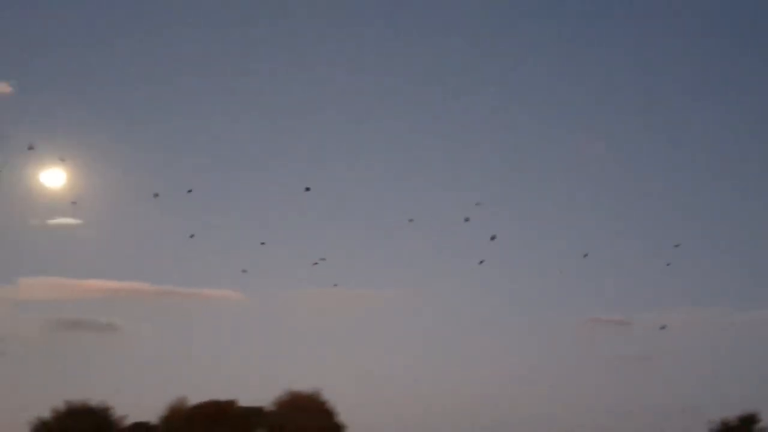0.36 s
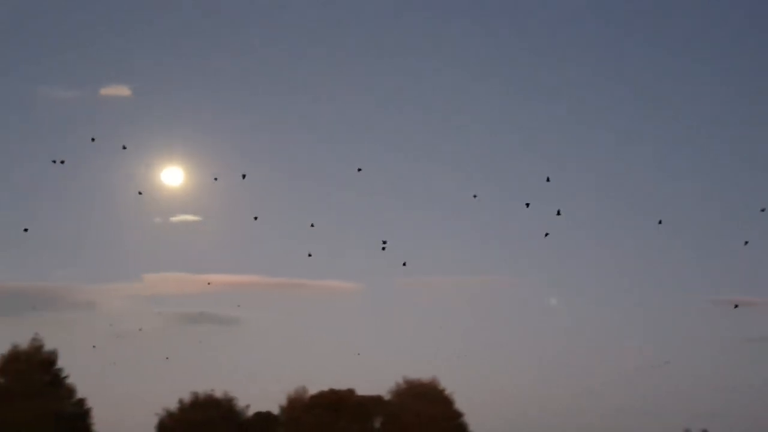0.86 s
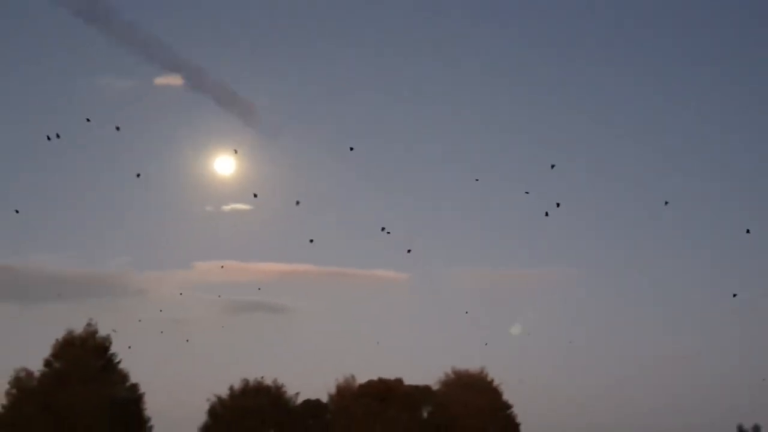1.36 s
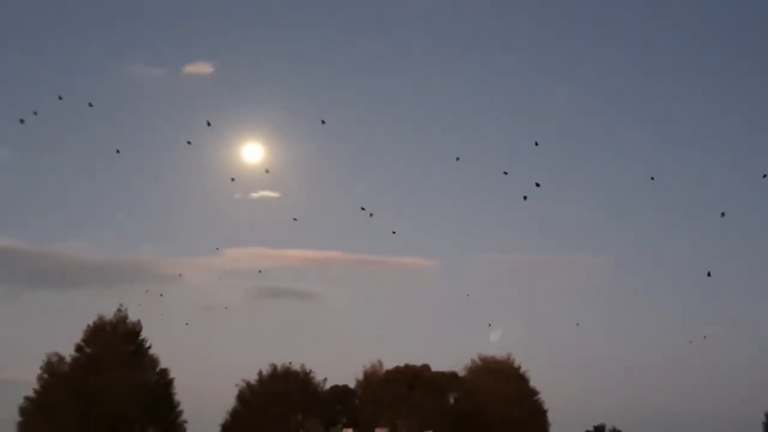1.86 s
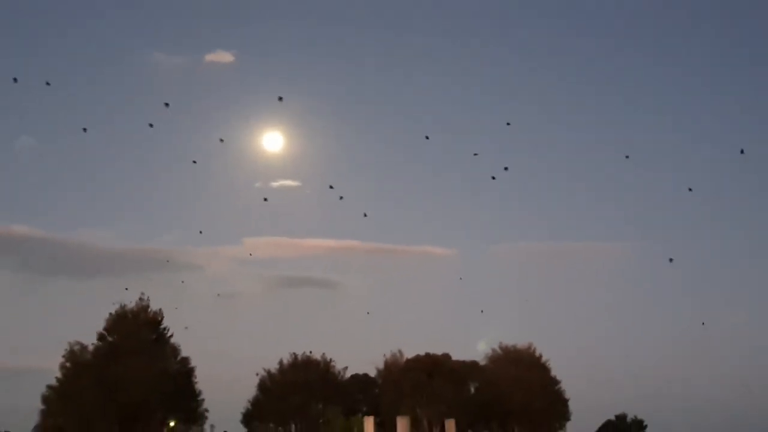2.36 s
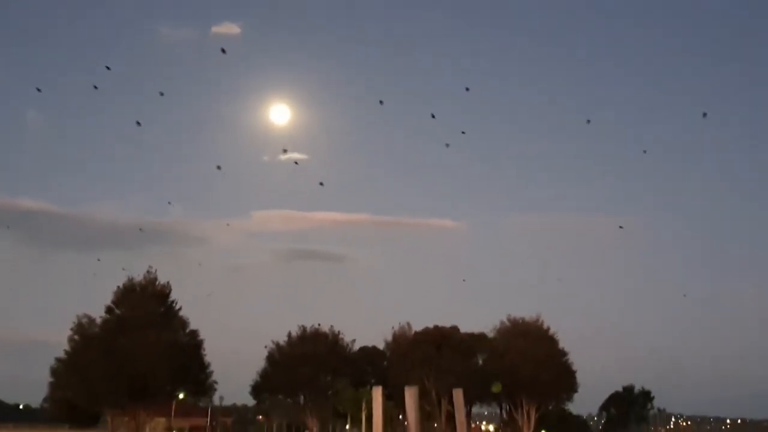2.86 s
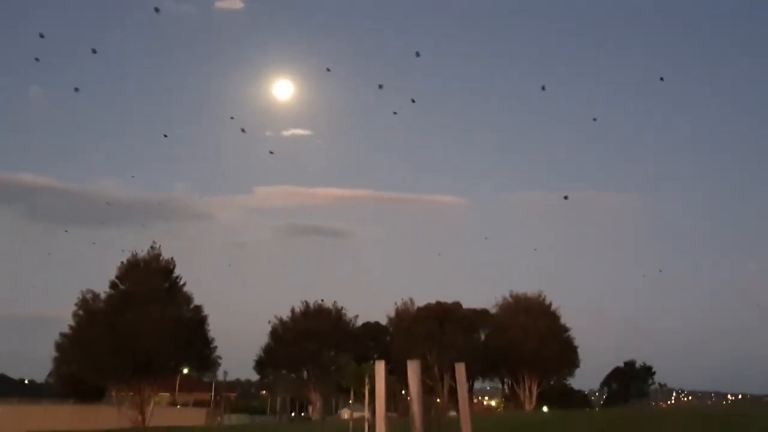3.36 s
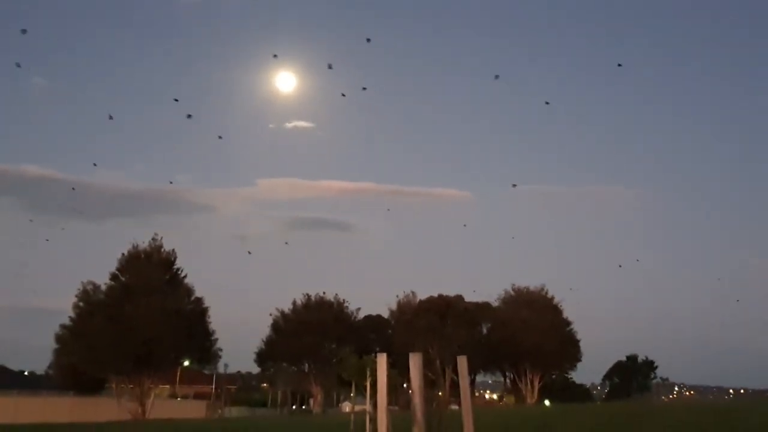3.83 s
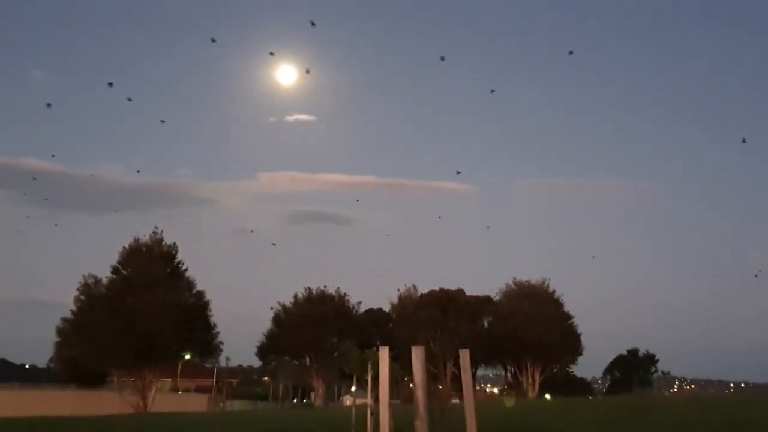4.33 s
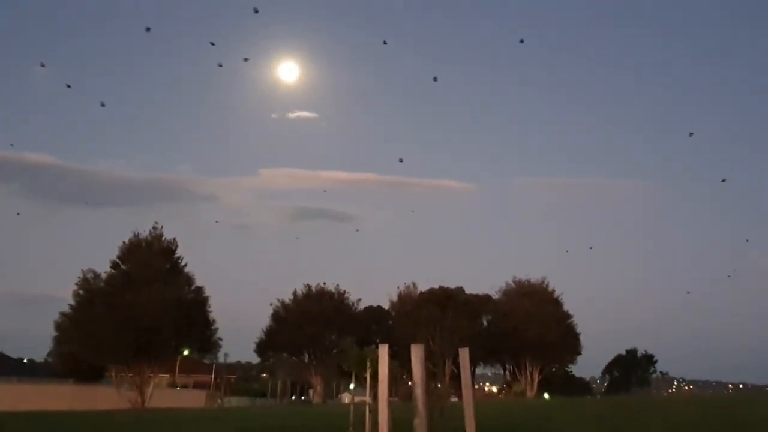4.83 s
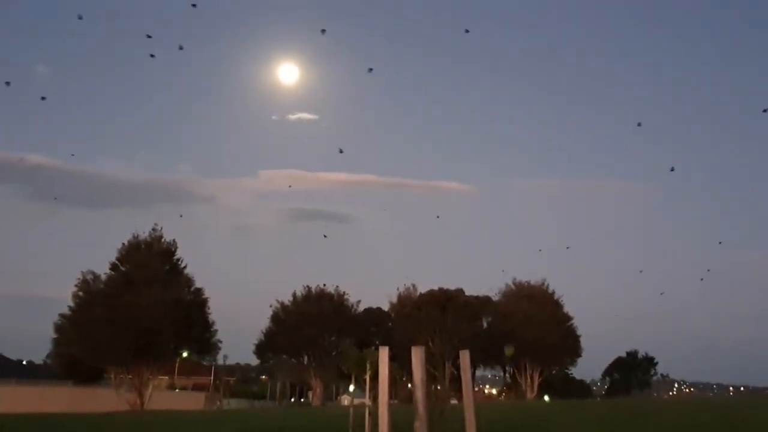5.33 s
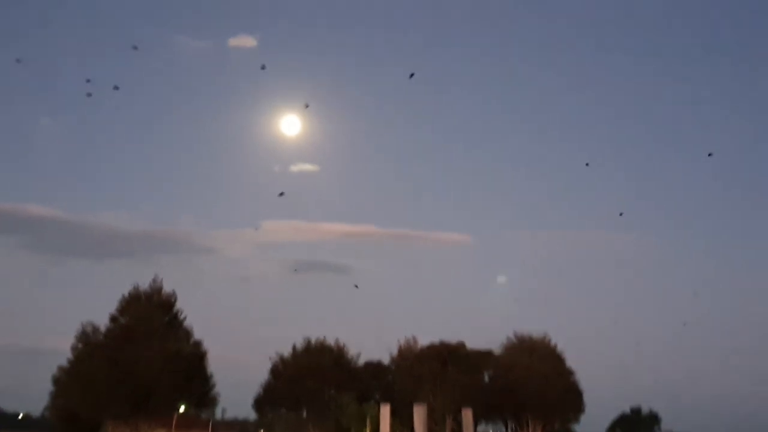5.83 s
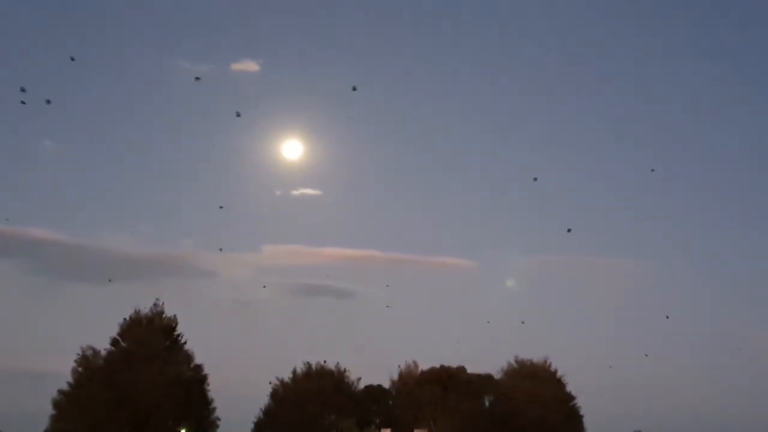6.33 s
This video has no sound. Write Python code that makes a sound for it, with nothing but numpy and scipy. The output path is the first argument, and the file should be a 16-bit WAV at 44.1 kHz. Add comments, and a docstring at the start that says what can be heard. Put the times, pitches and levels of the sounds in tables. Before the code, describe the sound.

A dusk field heard in stereo outdoors. From the start, a mole cricket at the left purrs at about 1.7 kHz, some 94 pulses a second, with a grassy haze. Distant crickets, hoarse frogs, soft air and low traffic rumble lie beneath; the rumble dips around 0.8, 1.5 and 1.9 s, and an engine swells near 1.4 s. Frogs swell around 1.1, 4 to 5 and 5.7 s. Tree-frog pips near 3.7 kHz fall in quickening phrases, with faint cricket chirps. A dry snap comes at 1.6 s. Bird chips sound at 2.3 and 2.55 s; the left midrange steps up at 2.4 s. A short rasp at 2.8 s precedes hoarse whistles at 3.05, 3.3, 3.6 and 3.9 s, with chips between. Katydid sizzle strengthens after 3.2 s. The purr breaks at 4.55-4.73 s; a trill runs 4.4-5.1 s. Snaps fall at 5.0 and 5.7 s. Wind thumps grow from 4.2 s, heaviest around 5.8-6.3 s at left.

```python
"""A mole cricket purrs on the left of a field at dusk: trains of short tone bursts and their haze.
Katydids buzz high up as gated noise; frogs and far crickets are noise bands, the nearer pips, chirps
and trill gliding bursts. A small bird chips, rasps and whistles with a warbled pitch; dry snaps fall nearby.
Gusts beat on the microphone ports as distorted low noise, harder on the left, over soft air noise
and the rumble of far traffic with two engines. Partway through, the left middle range steps up."""
import sys
import numpy as np
from scipy import signal
from scipy.fft import rfft, irfft
from scipy.io import wavfile
from scipy.ndimage import map_coordinates

SR = 44100
rng = np.random.default_rng(int(sys.argv[2]) if len(sys.argv) > 2 else 0)


def nominal_scale(level):
    """Amplitude ratio for a level in decibels (scalar or array-like)."""
    x = np.asarray(level, float) / 20
    return 10 ** x


def file_out(sig):
    """Save sig as 16-bit WAV at sys.argv[1]."""
    # one column per channel
    cols = np.atleast_2d(sig).T
    # limit, then scale
    lim = np.clip(cols, -1, 1)
    pcm = np.round(lim * 32767).astype(np.int16)
    wavfile.write(sys.argv[1], SR, pcm)


N = 295470
TIME = np.arange(N) / SR   # s

# Road rumble spectrum: (frequency [Hz], relative density [dB per Hz])
TRAFFIC_COLOUR = [(30, -22), (55, 0.5), (90, 0), (260, -17.5), (700, -81.5)]
# Brief dips of the rumble: (time [s], depth [dB])
LULLS = [(.8, 11.5), (1.5, 4.5), (1.9, 6.5)]
TRAFFIC_DB, LULL_S = -41, 0.084   # rumble rms; time scale of a dip
# Orders of a nearly steady engine: (multiple of IDLE_HZ [1], level re the rumble [dB])
IDLE_ORDERS = [(1.999, -7.5), (4, -16), (5.85, -21.5)]
IDLE_HZ = 41.81
# An engine that speeds up, nears and is gone: (start of hold [s], length [s], level [dB])
PULL = [(1.4, 0.17, -50)]
PULL_HZ, PULL_HZ_PER_S = 38.8, 4.6

# Still air and far leaves: (frequency [Hz], relative density [dB per Hz])
AIR_COLOUR = [(150, -24.5), (400, -20.5), (1200, -30), (2800, -48.5), (3400, -41.5), (4700, -36.5),
              (5300, -52.5), (6700, -52.5), (7100, -74), (8300, -63), (9500, -51)]
# Air noise, left minus right: (frequency [Hz], difference [dB])
AIR_BALANCE = [(300, 5.4), (1200, 2.3), (2800, 19.4), (4500, 8.7), (6000, 29.2), (7500, 20)]
# Correlation of the air noise between ports: (frequency [Hz], likeness [1])
AIR_LIKENESS = [(700, 0.83), (1200, 0.033)]
AIR_DB = -55

# Turbulent pressure spectrum: (frequency [Hz], relative density [dB per Hz])
GUST_COLOUR = [(20, -9), (45, 0.5), (70, 2.5), (200, -18.5), (900, -80)]
# Gusts on the windward (left) port: (start of hold [s], length [s], nominal level [dB])
LEFT_GUSTS = [(2.6, 1.5, -42), (4.18, .25, -30.5), (4.6, 0.22, -26.5), (4.95, 0.36, -31), (5.8, .45, -21.5)]
# Stray gusts on the lee (right) port: (start of hold [s], length [s], nominal level [dB])
RIGHT_GUSTS = [(4.95, 0.026, -32), (6.42, 0.038, -28)]
CALM_DB, LEE_DB = -50.5, -13.5   # left port between gusts; lee port relative to the left

# Swells of the far frogs at the left: (start of hold [s], length [s], level [dB])
FROGS = [(1.1, 0.32, -46.5), (4.05, 0.97, -49.5), (5.65, 0.25, -48)]
# Partials of the humming voice: (multiple of HUM_HZ [1], relative level [dB])
HUM_PARTIALS = [(3, -3), (4, -3.5), (5, 1.5), (6, -4.5)]
FROG_REST_DB, HUM_DB = -53, -67   # chorus and hum between swells
HUM_HZ, HUM_FOLLOWS = 148.5, 1.2   # fundamental; hum rise per dB of chorus rise

# Katydid level: (time [s], level [dB])
KATYDIDS = [(1, -63), (3.2, -61), (3.45, -57), (3.65, -59), (4.9, -58), (6.3, -58.5), (6.7, -61.5)]
# Katydid spectra ahead of the band-pass, left and right: (frequency [Hz], relative level [dB])
KATYDID_LEFT = [(8200, -49), (9000, -5.5), (10500, 3.5), (11400, 2.5), (12000, 0.5), (13000, -1),
                (14400, -48)]
KATYDID_RIGHT = [(8200, -26), (9000, 0), (10500, 4), (11400, 7.5), (12500, 10.5), (13200, 3.5), (13800, 15),
                 (14500, -32)]
KATYDID_BLUR_DB = -65   # far blur alone; above it a near singer reaches both ports alike

# Tree-frog phrases of falling pips: (start [s], end [s], mean peak [dB])
PIP_PHRASES = [(.085, .58, -59.5), (.97, 1.2, -64), (1.36, 1.9, -58), (2.05, 2.5, -59.5), (2.66, 3.35, -59),
               (3.47, 4.0, -60), (4.1, 5.15, -58.5), (5.38, 5.66, -58), (5.8, 6.3, -58), (6.5, 6.7, -58)]
PIPS_PER_S = 17, 32   # early and late in a phrase
# Cricket chirps: (start [s], chirps [count], interval [s], pitch [Hz], mean peak [dB])
CRICKETS = [(.015, 7, .224, 4500, -63), (1.53, 11, .25, 4930, -66), (6.42, 2, .21, 4300, -59),
            (3.04, 20, .187, 7660, -74)]
CHIRP_S = .08
TRILL_S, TRILL_HZ, TRILL_DB = (4.44, 5.08), (3824, 3955), -51.5   # from and to; mean peak

# Bird chips: (time [s], peak [dB], centre pitch [Hz])
CHIPS = [(2.2578, -49, 2800), (2.284, -46, 2620), (2.5346, -56, 2800), (2.5604, -45.5, 2760),
         (2.588, -40.5, 2620), (3.2201, -49.5, 2700), (3.4905, -49, 2710), (3.775, -51.5, 2700)]
# Bird whistles: (start [s], pitch [Hz], level [dB])
WHISTLES = [(3.054, 3380, -43), (3.327, 3310, -43), (3.605, 3337, -41.5), (3.891, 3220, -45)]
SWELL_S, WARBLE_S, DROP_S = .022, .046, .015   # successive stages of a whistle
DROP_SHARE, WARBLES_PER_S = .2, 62   # share of the pitch lost in the drop
# The bird's rasp swells and holds: (start of hold [s], length [s], mean peak [dB])
RASP = [(2.895, 0.029, -47.5)]
RASP_FROM_S, RASP_PER_S = 2.785, 170

# Dry snaps nearby: (time [s], nominal peak [dB])
TICKS = [(1.619, -50), (4.998, -45.5), (5.684, -45)]

# Mole cricket purr, in stretches of steady or slowing stroke rate; the first two run on, a short pause
# precedes the third: (first stroke [s], end [s], initial rate [strokes/s], slowing [strokes/s each s])
MOLE_STRETCHES = [(.0098, 2.383, 93.72, 0), (2.3884, 4.55, 94.18, .6), (4.7294, 6.7, 94.5, .6)]
MOLE_DB = -43   # mean peak of a direct stroke at the left

LIFT_S, LIFT_DB, LIFT_HZ = 2.385, 8, (1024, 2997)   # step up of the left middle range


def rms_one(x):
    """Normalisation: scales to unit rms."""
    return x / np.sqrt(np.mean(x ** 2) + 1e-20)


def in_time(rows):
    """Linear interpolation: table columns become sample-rate curves."""
    s, *columns = np.transpose(rows)
    return [np.interp(TIME, s, c) for c in columns]


def at_hz(points):
    """Logarithmic frequency interpolation: a spectrum table read on the FFT grid."""
    hz, value = np.transpose(points)
    grid_hz = np.arange(N // 2 + 1) * SR / N
    return np.interp(np.log(grid_hz + 1), np.log(hz), value)


def colour(x, spectrum):
    """Linear filtering: multiplies the Fourier spectrum by a table of gains."""
    return irfft(rfft(x) * nominal_scale(at_hz(spectrum)), N)


def resonate(x, hz, width_hz):
    """Resonance: a Butterworth band-pass of order two around hz."""
    band_hz = [hz - width_hz / 2, hz + width_hz / 2]
    return signal.sosfilt(signal.butter(2, band_hz, "band", fs=SR, output="sos"), x)


def drift(rate):
    """Random modulation: smooth chance of about unit spread, with about rate changes a second."""
    points = rng.standard_normal(4000)
    return map_coordinates(points, [TIME * rate + 2], order=3)


def add(out, s, peak_db, from_hz, to_hz, length, phase=0.):
    """Frequency modulation: adds one bell-shaped gliding tone burst that starts at s."""
    t = np.arange(int(length * SR)) / SR
    cycles = from_hz * t + (to_hz - from_hz) * t ** 2 / (2 * length)
    burst = nominal_scale(peak_db) * np.sin(np.pi * t / length) ** 2 * np.sin(phase + 2 * np.pi * cycles)
    i = max(int(s * SR), 0)
    out[i:i + len(t)] += burst[:max(N - i, 0)]


def place(x, pan_db, lag=12):
    """Interaural differences: left louder by pan_db, right later by lag samples."""
    return np.array([x, nominal_scale(-pan_db) * np.roll(x, int(lag))])


def scatter(x, decay_s):
    """Multiple scattering: grass and trees return a short dying haze, its own at each port."""
    tails = rng.standard_normal((2, 4000)) * np.exp(-np.arange(4000) / SR / decay_s)
    return np.array([signal.fftconvolve(x, tail / np.sqrt(np.sum(tail ** 2)))[:N] for tail in tails])


def swell(rows, rest_db, rise_db_per_s, fall_db_per_s):
    """Exponential growth and decay: dB climb to each row's level, hold, then sink back to rest."""
    level_db = np.full(N, float(rest_db))
    for s, length, db in rows:
        before_s = np.maximum(s - TIME, 0)
        after_s = np.maximum(TIME - s - length, 0)
        level_db = np.maximum(level_db, db - (rise_db_per_s * before_s + fall_db_per_s * after_s))
    return level_db


def traffic():
    """Harmonic engine orders over broadband road noise: two far engines waver, rumble leads at the left."""
    shared, own = rng.standard_normal((2, N))
    delayed = np.roll(shared, 16) + 0.28 * own
    rumble = [rms_one(colour(v, TRAFFIC_COLOUR)) for v in (shared, delayed)]
    dips_db = sum(depth_db * np.exp(-((TIME - s) / LULL_S) ** 2) for s, depth_db in LULLS)
    rumble_db = TRAFFIC_DB - dips_db
    idle = 2 * np.pi * np.cumsum(IDLE_HZ * (1 + 0.0151 * drift(2))) / SR
    engines = sum(nominal_scale(rumble_db + db + 5.34 * drift(7)) * np.sin(k * idle) for k, db in IDLE_ORDERS)
    pull_db = swell(PULL, -120, rise_db_per_s=7.5, fall_db_per_s=130)
    turn = 2 * np.pi * np.cumsum(PULL_HZ + PULL_HZ_PER_S * TIME) / SR
    engines += nominal_scale(pull_db + 4.4 * drift(5.45)) * (np.sin(3 * turn) + 0.8 * np.sin(4 * turn))
    return nominal_scale(rumble_db) * rumble + place(engines, pan_db=1.1, lag=8.8)


def air():
    """Spatial coherence: steady far noise, alike at both ports only in the bass."""
    mid, side = rfft(rng.standard_normal((2, N))) * nominal_scale(at_hz(AIR_COLOUR))
    alike = np.clip(at_hz(AIR_LIKENESS), 0, 1)
    half_balance = nominal_scale(at_hz(AIR_BALANCE) / 2)
    mid, side = np.sqrt(1 + alike) * mid, np.sqrt(1 - alike) * side
    return nominal_scale(AIR_DB) * rms_one(irfft([(mid + side) * half_balance, (mid - side) / half_balance], N))


def wind():
    """Nonlinear flow pressure: lumpy at each port; suction peaks sharpen and strong gusts reach higher."""
    out = []
    left_db = swell(LEFT_GUSTS, CALM_DB, rise_db_per_s=28, fall_db_per_s=10)
    stray_db = swell(RIGHT_GUSTS, -80, rise_db_per_s=95, fall_db_per_s=44)
    right_db = np.maximum(left_db + LEE_DB, stray_db)
    for port_db in (left_db, right_db):
        flow = rms_one(colour(rng.standard_normal(N), GUST_COLOUR)) * nominal_scale(1.5 * drift(14))
        strength = nominal_scale(1.3 * (port_db + 24))
        suction = 0.22 * strength * (np.minimum(flow ** 2, 7.0) - 1)
        out.append(nominal_scale(port_db) * (flow - suction))
    return signal.sosfilt(signal.butter(2, 35, "high", fs=SR, output="sos"), out)


def far_chorus():
    """Incoherent summation: many distant crickets blur into two narrow bands; the upper one throbs."""
    low, high = rng.standard_normal((2, 2, N))
    throb = nominal_scale(0.63 * np.sin(2 * np.pi * 4.4 * TIME) + 2.4 * drift(12))
    low_band = rms_one(resonate(resonate(low, 1752, 280), 1744, 400))
    high_band = rms_one(resonate(resonate(high, 2030, 350), 2070, 590))
    return nominal_scale([[-61], [-56]]) * low_band + nominal_scale(-63) * throb * high_band


def frogs():
    """Resonance and harmonic series: a hoarse band from many throats, one steadier voice with partials."""
    chorus_db = swell(FROGS, FROG_REST_DB, rise_db_per_s=40, fall_db_per_s=13)
    hum_db = HUM_DB + HUM_FOLLOWS * (chorus_db - FROG_REST_DB)
    shared, own = rng.standard_normal((2, N))
    delayed = np.roll(shared, 8) + 0.4 * own
    hoarse = [rms_one(resonate(resonate(v, 758, 358), 684, 290)) for v in (shared, delayed)]
    turn = 2 * np.pi * np.cumsum(HUM_HZ * (1 + 0.0035 * drift(5))) / SR
    hum = sum(nominal_scale(db + 6.2 * drift(4)) * np.sin(k * turn + k) for k, db in HUM_PARTIALS)
    return nominal_scale(chorus_db - [[0], [4]]) * hoarse + place(nominal_scale(hum_db) * hum, pan_db=2.5, lag=9.9)


def katydids():
    """Stridulation: two files scraped at nearby rates, sharp rasp and weaker after-stroke, over a blur."""
    gate = 0.94   # the ungated blur
    for per_s, share in ((181.1, 0.95), (190.5, 0.4)):
        turn = 2 * np.pi * (per_s * TIME + 0.27 * drift(1.57) + 0.63)
        rasp = np.exp(5.8 * (np.cos(turn) - 1))
        after_stroke = 0.58 * np.exp(5.4 * (np.cos(turn - 1.1) - 1))
        gate = gate + share * nominal_scale(2.8 * drift(2.13)) * (rasp + after_stroke)
    level_db = in_time(KATYDIDS)[0]
    alike = np.clip(1 - nominal_scale(2 * (KATYDID_BLUR_DB - level_db)), 0, 1)
    shared, *own = rng.standard_normal((3, N))
    ports = []
    for o, spectrum in zip(own, (KATYDID_LEFT, KATYDID_RIGHT)):
        mixed = np.sqrt(alike) * shared + np.sqrt(1 - alike) * o
        ports.append(colour(gate * mixed, spectrum))
    return nominal_scale(level_db + 0.69 * drift(5.13)) * rms_one(resonate(np.array(ports), 9700, 6500))


def small_singers():
    """Pulse trains of gliding tones: tree-frog pips fall and come faster; crickets chirp and trill."""
    out, chirps = np.zeros((2, N))
    for (start, end, peak_db), sizes in zip(PIP_PHRASES, rng.standard_normal((len(PIP_PHRASES), 40))):
        s = start
        for size in sizes:
            if s < end:
                add(out, s - .015, peak_db + 1.5 * size, 3950, 3550, .03)
            s += 1 / np.interp(s - start, [.18, .3], PIPS_PER_S)
    for start, count, every, hz, peak_db in CRICKETS:
        chance = rng.standard_normal((count, 12, 2))
        for k in range(count):
            strokes = start + every * k + np.arange(0, CHIRP_S, 1 / 95)
            for s, (size, phase) in zip(strokes, chance[k]):
                add(chirps, s, peak_db + 2.0 * size, hz + 60, hz - 60, .011, 9 * phase)
    for s, (size, phase) in zip(np.arange(*TRILL_S, 1 / 60), rng.standard_normal((60, 2))):
        hz = np.interp(s, TRILL_S, TRILL_HZ)
        add(out, s, TRILL_DB + 1.4 * size, hz + 350, hz - 350, .012, 9 * phase)
    # more of them, far off
    blur = nominal_scale(-73.5 + 1.2 * drift(4.2)) * rms_one(resonate(rng.standard_normal(N), 3750, 360))
    return place(out + blur, pan_db=11) + place(chirps, pan_db=4)


def bird():
    """Frequency and amplitude modulation: chips, a rasp of falling pulses, hoarse warbled whistles."""
    out = np.zeros(N)
    for s, peak_db, hz in CHIPS:
        add(out, s - .003, peak_db, hz + 110, hz - 110, .012)
    for s, hz, level_db in WHISTLES:
        since_drop = TIME - s - SWELL_S - WARBLE_S
        dropped = np.clip(since_drop / DROP_S, 0, 1)
        hold = [(s + SWELL_S, WARBLE_S + DROP_S, level_db)]
        shape_db = swell(hold, -120, rise_db_per_s=509, fall_db_per_s=4000)
        shape_db += 60 * np.minimum(since_drop, 0)   # keeps growing until the drop
        warble = .035 * np.cos(2 * np.pi * WARBLES_PER_S * since_drop) * (1 - dropped)
        pitch_hz = hz * (1 - DROP_SHARE * dropped + warble + .012 * drift(250))
        turn = 2 * np.pi * np.cumsum(pitch_hz) / SR
        hoarseness = 1 + .36 * drift(450)
        tone = np.sin(turn) + nominal_scale(-14) * np.sin(2 * turn)   # with a faint octave
        out += (TIME > s) * nominal_scale(shape_db) * hoarseness * tone
    rasp_db = swell(RASP, -120, rise_db_per_s=75, fall_db_per_s=1300)
    pulses = RASP_FROM_S + np.arange(26) / RASP_PER_S
    for s, (size, slip, pitch) in zip(pulses, rng.standard_normal((26, 3))):
        peak_db = rasp_db[int(s * SR)] + 2.3 * size
        add(out, s + .0003 * slip, peak_db, 3700 + 150 * pitch, 2400, .0075, 1.2 * pitch)
    return place(out, pan_db=1.5, lag=4) + nominal_scale([[-11], [-12]]) * scatter(out, decay_s=.015)


def ticks():
    """Impulse response: a sharp wide crack and a short grainy rustle dying after it."""
    crack, rustle = np.zeros((2, N))
    for s, peak_db in TICKS:
        crack[int(s * SR)] = nominal_scale(peak_db + 23)   # makes up for the band-pass loss
        rustle += (TIME >= s) * nominal_scale(peak_db + 0.5) * np.exp(-np.maximum(TIME - s, 0) / 0.04)
    noise = rustle * nominal_scale(2 * drift(300)) * rng.standard_normal(N)
    grains = resonate(noise, 3400, 1800) + .5 * resonate(noise, 2460, 3000)
    return place(grains + resonate(resonate(crack, 3400, 5400), 3600, 6400), pan_db=8.0)


def mole_cricket():
    """Stridulation: each wing stroke is a short falling tone of fresh phase; grass scatters it to a haze."""
    direct = np.zeros(N)
    for first, end, per_s, slowing in MOLE_STRETCHES:
        since = np.maximum(TIME - first, 0)
        beat = np.ceil(per_s * since - slowing * since ** 2 / 2)
        strokes = TIME[1:][(np.diff(beat) > 0) & (TIME[1:] < end)]
        for s, (size, pitch, slip, phase) in zip(strokes, rng.standard_normal((len(strokes), 4))):
            hz = 1665 + 18 * pitch
            start = s - .0035 + .0002 * slip
            add(direct, start, MOLE_DB + 1.1 * size, hz + 75, hz - 75, .0072, 9 * phase)
    haze = scatter(direct, decay_s=0.0063)
    return place(direct, pan_db=14, lag=3) + nominal_scale([[-15], [-16]]) * haze


def scene():
    """Superposition: the pressures of all sources add at the two ports."""
    background = traffic() + air() + wind() + far_chorus() + frogs()
    return background + katydids() + small_singers() + bird() + ticks() + mole_cricket()


def band_limit(x):
    """A steep low-pass at the top of the band."""
    return signal.sosfilt(signal.butter(12, 15220, fs=SR, output="sos"), x)


def record(dry):
    """Band emphasis: adding a band-passed copy steps up the left middle range from LIFT_S on."""
    middle = signal.sosfilt(signal.butter(1, LIFT_HZ, "band", fs=SR, output="sos"), dry[0])
    left = dry[0] + (nominal_scale(LIFT_DB) - 1) * (TIME > LIFT_S) * middle
    return band_limit(np.array([left, dry[1]]))


dry = scene()
out = record(dry)
file_out(out)
```